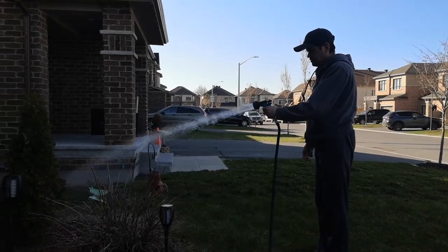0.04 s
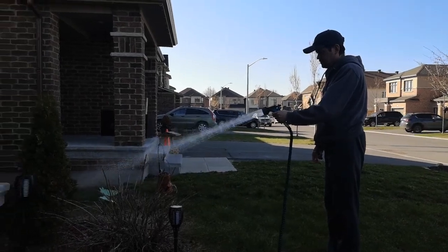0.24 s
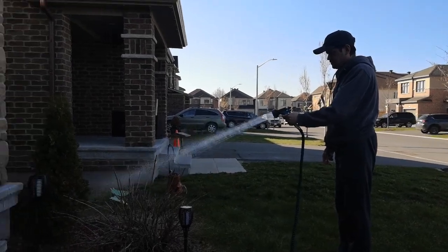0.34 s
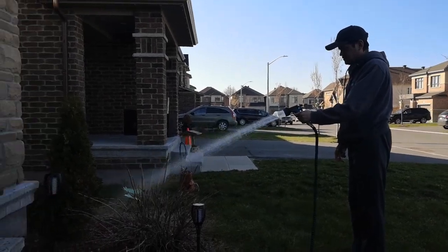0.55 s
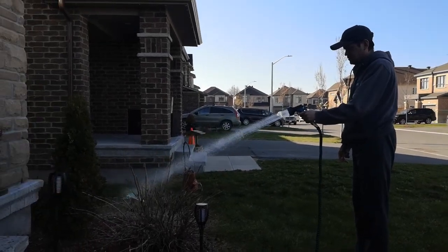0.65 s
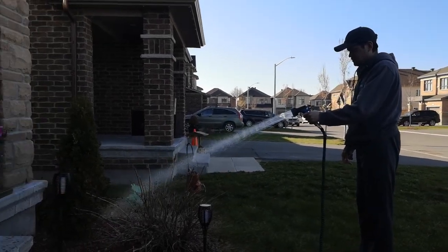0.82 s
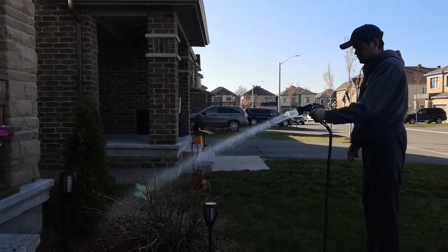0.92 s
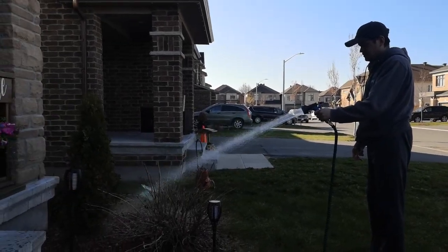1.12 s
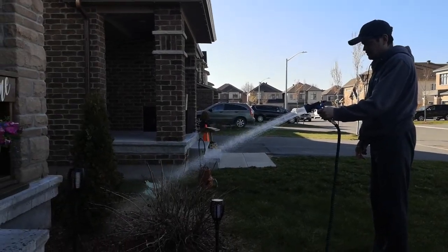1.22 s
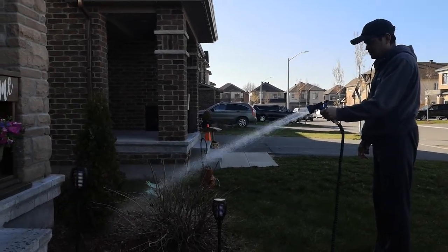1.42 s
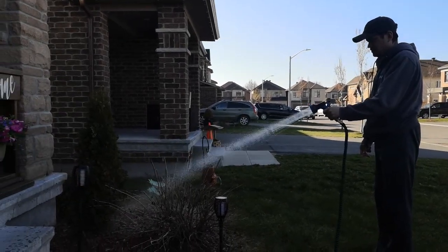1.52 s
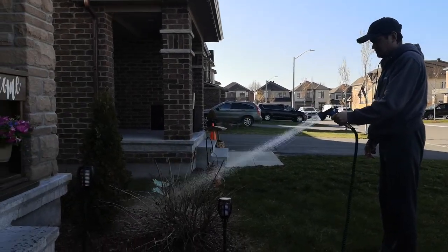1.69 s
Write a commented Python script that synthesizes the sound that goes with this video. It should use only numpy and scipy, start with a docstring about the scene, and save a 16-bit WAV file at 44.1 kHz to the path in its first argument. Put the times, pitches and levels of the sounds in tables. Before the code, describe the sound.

A hose jet hisses over shrubs and soil a few metres away, surging brighter early on, with uneven strength and tiny drop ticks; wind buffets the stereo microphone outdoors, and two small clicks come near the end.

```python
"""A garden hose sprays shrubs and soil a few metres away: random droplet impacts over steady noise make
a fine hiss, which a brighter surge joins once. Narrow bands of noise ring faintly in it, and a few near
drops tick as short noise bursts. A small hard object clicks twice. Wind is shaped turbulence with single
pressure pulses, reaching the left port first, over quiet outdoor air. The right port hears little treble."""
import sys
import numpy as np
from scipy import signal
from scipy.fft import rfft, irfft
from scipy.io import wavfile
from scipy.ndimage import uniform_filter1d, map_coordinates

SR = 44100
rng = np.random.default_rng(int(sys.argv[2]) if len(sys.argv) > 2 else 0)


def wav_record(signal):
    """Record a signal, one row per channel, as 16-bit PCM in the file named by sys.argv[1]."""
    frames = np.transpose(np.atleast_2d(signal))
    bounded = np.clip(frames, -1, 1)
    # unit amplitude maps onto the largest positive 16-bit level
    quanta = np.round(bounded * 32767).astype(np.int16)
    wavfile.write(sys.argv[1], SR, quanta)


N = 77175  # samples

SPRAY_LAG_S = .00023  # delay of the hose sound at the right port


def amp(db):
    """Level to gain: 20 dB is a factor of ten in pressure."""
    return 10 ** (np.asarray(db) / 20)


def unit(x):
    """Normalisation to an rms of 1, so that a later gain sets the level."""
    return x / np.sqrt(np.mean(x ** 2) + 1e-20)


def times():
    """Uniform sampling: the time of every sample [s]."""
    return np.arange(N) / SR


def noise():
    """White noise: independent samples, hence equal power at all frequencies."""
    return rng.standard_normal(N)


def colour(x, points):
    """Linear filtering: a gain curve of (frequency [Hz], level [dB]), joined on a log-frequency axis."""
    hz, db = np.array(points, float).T
    f = np.maximum(np.fft.rfftfreq(N, 1 / SR), 1)
    gain = amp(np.interp(np.log(f), np.log(hz), db))
    return irfft(rfft(x) * gain, N)


def band(x, hz, width_hz):
    """Band-pass filtering: the gain is halved at half the width from the centre."""
    f = np.fft.rfftfreq(N, 1 / SR)
    detuning = 2 * (f - hz) / width_hz
    return irfft(rfft(x) / (1 + detuning ** 2), N)


def walk(rate_hz):
    """Low-passed noise: a smooth random wander of rms 1."""
    return unit(band(noise(), 0, 2 * rate_hz))


def swell(at, length):
    """Smooth envelope: a rise, a short hold and a fall, symmetric about its centre."""
    return np.exp(-np.abs((times() - at) / length) ** 3 * 2)


def decay(at, seconds):
    """Exponential damping after a sudden start."""
    age = times() - at
    return (age >= 0) * np.exp(-np.maximum(age, 0) / seconds)


def late(x, seconds):
    """Propagation delay: the same sound a little later, interpolated between samples."""
    return map_coordinates(x, [(times() - seconds) * SR], mode="nearest")


def ports(left, right):
    """Acoustic shading: the right port loses most of the treble."""
    # right port against left: (frequency [Hz], level [dB])
    right_response = [(300, -3), (1200, -0.5), (2200, 1), (3400, 6), (4200, 0), (5000, -13), (5700, -8.5),
                      (6400, -41), (8300, -14), (9300, -51), (10500, -12), (14000, -16)]
    return np.array([left, colour(right, right_response)])


def patter():
    """Shot noise: random droplet impacts over the steady rush of the jet, with a density of 0 dB per Hz."""
    droplets_per_s, spread_db = 2500, 2
    impact_share = 0.64  # of the power
    hits = (rng.random(N) < droplets_per_s / SR) * np.sign(noise())
    # a few impacts are much stronger than the rest
    hits = hits * amp(spread_db * np.minimum(rng.exponential(size=N), 6))
    mix = np.sqrt(impact_share) * unit(hits) + np.sqrt(1 - impact_share) * noise()
    return mix * np.sqrt(SR / 2)


def surge_gain():
    """Amplitude envelope: a squared rise, a sagging hold and an exponential release."""
    start_s, rise_s, hold_s, fall_s = 0.11, 0.11, 0.17, 0.061
    level_db, sag_db_per_s = 3, -9.5  # the level holds at the end of the rise
    t = times()
    full = start_s + rise_s
    rise = np.interp(t, [start_s, full], [0, 1]) ** 2
    release = np.exp(-np.maximum(t - full - hold_s, 0) / fall_s)
    return rise * release * amp(level_db + sag_db_per_s * (t - full))


def spray():
    """Partial coherence: water hits shrubs and soil; part of the hiss reaches both ports alike."""
    # strength of the spray: (time [s], level [dB])
    strength = [(0, -3), (.14, -4.5), (.2, -1.5), (.45, -4.5), (.56, -5), (.63, 4), (.7, -0.5), (.81, 1.5),
                (.9, -1.5), (.98, -2.5), (1.06, .5), (1.16, -2), (1.25, 2.5), (1.38, -1), (1.52, -.5),
                (1.65, -7.5), (1.75, -5)]
    # spray at 0 dB strength: (frequency [Hz], density [dB per Hz])
    spray_spectrum = [(300, -116.5), (900, -95), (1500, -99), (1850, -95), (2500, -98), (3200, -100.5),
                      (4300, -99), (5600, -94), (6200, -96.5), (7700, -91.5), (8300, -95.5), (9200, -95),
                      (10200, -103), (11500, -104), (14500, -102)]
    # brighter hiss of the surge at 0 dB gain: (frequency [Hz], density [dB per Hz])
    surge_spectrum = [(500, -98), (1400, -100), (2000, -95), (3000, -100), (4000, -97), (4900, -92.5),
                      (5800, -84), (7800, -86), (8250, -90), (9000, -87.5), (10200, -98), (12000, -101),
                      (15000, -102)]
    flicker_db, flicker_hz = 1.36, 7.6
    shared = 0.27  # amplitude share of the left signal in the right one
    flow = amp(np.interp(times(), *np.array(strength).T) + flicker_db * walk(flicker_hz))
    surge = surge_gain()
    left, scattered = [flow * colour(patter(), spray_spectrum) + surge * colour(patter(), surge_spectrum)
                       for _ in range(2)]
    right = shared * late(left, SPRAY_LAG_S) + np.sqrt(1 - shared ** 2) * scattered
    return ports(left, right)


def rings():
    """Quadrature modulation: two random wanders on a gliding carrier make faint, half-whistling bands."""
    # (centre time [s], swell length [s], frequency [Hz], glide [Hz per s], width [Hz], level [dB],
    # left minus right [dB])
    ring_bands = [(.63, 0.062, 1993, -300, 110, -58.5, -11), (.77, 0.18, 2016, -300, 260, -66, -11.5),
                  (.64, 0.085, 2450, -0.5, 204, -60.5, -2), (.83, 0.2, 2460, -1, 260, -57, 0.5),
                  (0.899, 0.23, 1222, -250, 120, -63, -0.5), (1.08, 0.059, 2910, -250, 80, -64.5, -5),
                  (1.423, 0.23, 2860, -150, 90, -74, 8)]
    t, out = times(), 0
    for at, length, hz, glide, width, db, pan_db in ring_bands:
        phase = 2 * np.pi * np.cumsum(hz + glide * (t - at)) / SR
        narrow_noise = walk(width / 2) * np.cos(phase) + walk(width / 2) * np.sin(phase)
        tone = amp(db) * swell(at, length) * narrow_noise
        pan = amp([[pan_db / 2], [-pan_db / 2]])
        out = out + pan * np.array([tone, late(tone, SPRAY_LAG_S)])
    return out


def drops():
    """Impulsive excitation: stray drops tick close by, each a damped, band-passed noise burst."""
    # (time [s], peak level [dB], frequency [Hz], width [Hz])
    near_drops = [(0.0932, -38, 9300, 8150), (.778, -36, 13500, 6000), (0.838, -38.5, 13100, 6000),
                  (1.149, -41, 6430, 3000), (1.2217, -42, 7400, 3000)]
    decay_s = 0.00087
    out = 0
    for at, db, hz, width in near_drops:
        tick = band(noise() * decay(at, decay_s), hz, width)
        out = out + amp(db) * tick / np.abs(tick).max()
    return ports(out, out)


def knocks():
    """Modal vibration: a small hard object clicks twice, each a noisy crack and one damped mode."""
    # (time [s], starting level of the mode [dB])
    clicks = [(1.549, -41.5), (1.5636, -49.5)]
    mode_hz, mode_decay_s, crack_decay_s = 1770, 0.0034, 0.00066
    right_db = -9.5  # right port against left
    out = 0
    for at, db in clicks:
        ring = decay(at, mode_decay_s) * np.sin(2 * np.pi * mode_hz * (times() - at))
        crack = decay(at, crack_decay_s) * unit(band(noise(), 2900, 2200))
        out = out + amp(db) * (ring + crack)
    return np.array([out, amp(right_db) * out])


def turbulence(spectrum, even_s):
    """Random pressure fluctuation: shaped noise whose running rms over even_s is held at 1."""
    x = colour(noise(), spectrum)
    return x / np.sqrt(uniform_filter1d(x ** 2, int(even_s * SR), mode="wrap"))


def gusts():
    """Turbulent pressure: rumble and flutter follow the gusts, and finer turbulence grows with flutter."""
    # strength of the wind: (time [s], rumble level [dB], flutter level [dB])
    gust_levels = [(0, -42.5, -35), (.08, -39, -63.5), (.19, -34.5, -56), (0.301, -31, -41.5),
                   (0.442, -39, -61), (0.501, -30, -39.5), (.62, -32.5, -45), (.72, -28, -41),
                   (.83, -22, -29), (0.868, -23.5, -38), (0.942, -18.5, -23.5), (1.032, -31.5, -51.5),
                   (1.132, -24.5, -24.5), (1.218, -28, -47), (1.318, -45, -26.5), (1.39, -36, -36.5),
                   (1.458, -28.5, -37), (1.505, -36, -61.5), (1.67, -49.5, -68.5), (1.75, -36, -39.5)]
    # relative spectra of the large, middling and fine turbulence: (frequency [Hz], density [dB per Hz])
    rumble_spectrum = [(10, 0), (25, 1.5), (52, -3.5), (80, -9.5), (130, -30), (300, -50.5), (900, -91)]
    flutter_spectrum = [(40, -17), (90, -3.5), (140, 4), (230, -5), (330, -14.5), (450, -19.5), (700, -62),
                        (1600, -79)]
    fine_spectrum = [(120, -29), (250, 1.5), (340, -2), (480, -3), (700, -26.5), (1100, -43), (2000, -58)]
    # fine level at one flutter level, and dB gained per dB of flutter
    fine_db, at_flutter_db, growth = -37.5, -28, 1.7
    at, rumble_points, flutter_points = np.array(gust_levels).T
    rumble_db = np.interp(times(), at, rumble_points)
    flutter_db = np.interp(times(), at, flutter_points)
    rumble = amp(rumble_db) * turbulence(rumble_spectrum, 0.096)
    flutter = amp(flutter_db) * turbulence(flutter_spectrum, 0.072)
    fine = amp(fine_db + growth * (flutter_db - at_flutter_db)) * turbulence(fine_spectrum, 0.086)
    return rumble + flutter + fine


def eddies():
    """Vortex pressure: each single eddy that hits the ports sucks, then pushes."""
    # (time [s], peak level [dB], length scale [ms])
    pulses = [(.008, -26, 4.8), (0.295, -25, 4.14), (0.504, -28, 7.1), (0.548, -37, 1.7),
              (0.582, -21.5, 13.3), (.66, -21, 3.96), (0.723, -15.5, 7.7), (.799, -13.5, 2.17),
              (0.835, -17, 2.9), (.903, -15.5, 2.7), (0.913, -12, 2.56), (0.942, -20.5, 1.88),
              (.949, -8, 2.1), (.956, -18, 1.75), (.973, -16, 2.53), (1.09, -7.5, 2.06), (1.13, -10.5, 2.2),
              (1.155, -15.5, 4.34), (1.287, -15, 1.85), (1.297, -11, 1.7), (1.301, -11, 6),
              (1.341, -20.5, 3.5), (1.354, -10, 2.6), (1.361, -14, 2.2), (1.451, -16.5, 4.15),
              (1.731, -25.5, 4.13)]
    out = 0
    for at, db, length_ms in pulses:
        u = (times() - at) / length_ms * 1000
        push = u / (1 + u ** 2) ** 4
        out = out + amp(db) * push / push.max()
    return out


def wind():
    """Convection: gusts and eddies drift past the left port, then the right, where they are duller."""
    # right port against left: (frequency [Hz], level [dB])
    right_wind = [(60, 0), (200, -1.5), (380, -3.5), (700, -6)]
    port_lag_s, fade_s = .001, .004
    t = times()
    air = gusts() + eddies()
    ends = np.minimum(1, np.minimum(t, t[-1] - t) / fade_s)  # fades in and out
    return np.array([air * ends, colour(late(air, port_lag_s) * ends, right_wind)])


def outdoor_air():
    """Diffuse background: independent shaped noise at each port."""
    # still outdoor air: (frequency [Hz], density [dB per Hz])
    air_spectrum = [(100, -88), (300, -89.5), (500, -102), (1200, -102), (2400, -101), (3600, -110),
                    (15000, -118)]
    left, right = [colour(noise(), air_spectrum) * np.sqrt(SR / 2) for _ in range(2)]
    return ports(left, right)


def scene():
    """Superposition: hose, small clicks and wind add over quiet outdoor air."""
    return spray() + rings() + drops() + knocks() + wind() + outdoor_air()


def record(dry):
    """Band limitation: the recorder cuts the top with a steep elliptic low-pass."""
    top_hz = 15100
    low_pass = signal.ellip(10, .2, 80, top_hz, fs=SR, output="sos")  # ripple and stop-band depth [dB]
    return signal.sosfilt(low_pass, dry)


dry = scene()
out = record(dry)
wav_record(out)
```